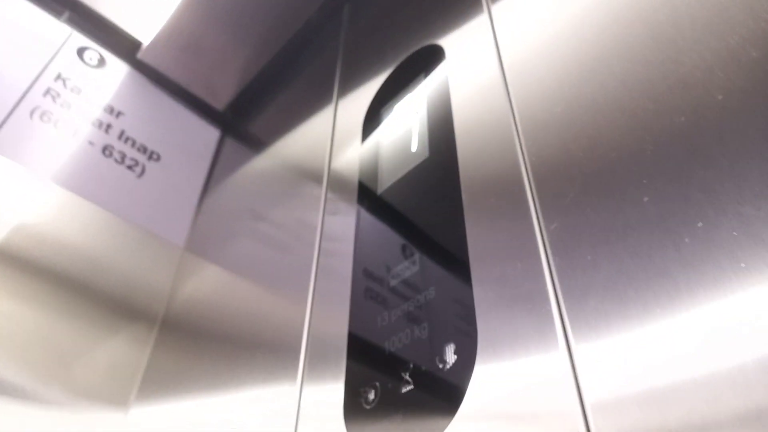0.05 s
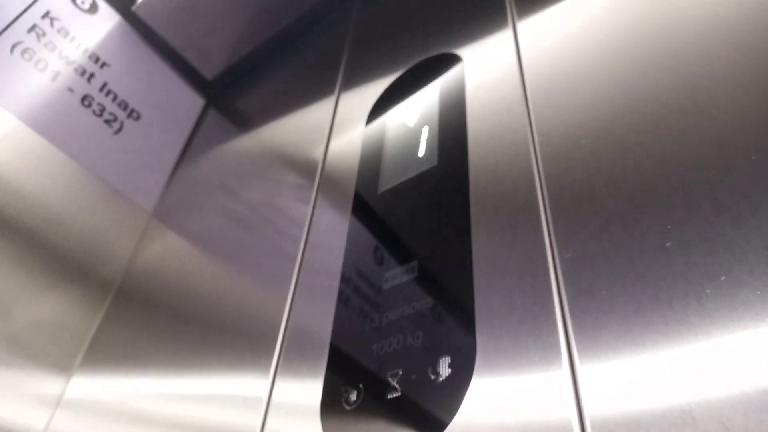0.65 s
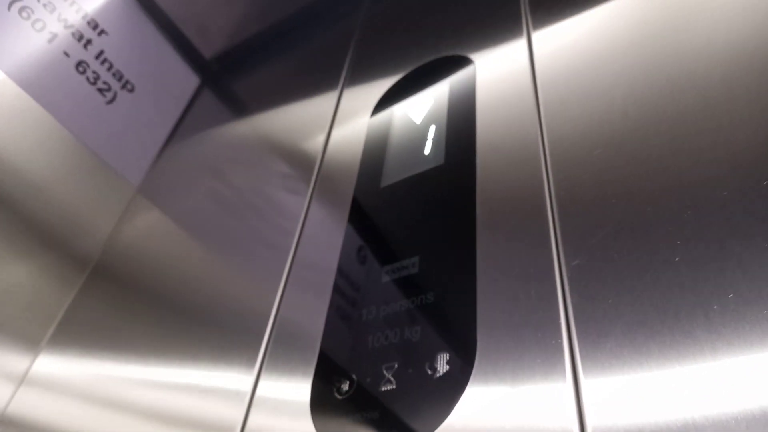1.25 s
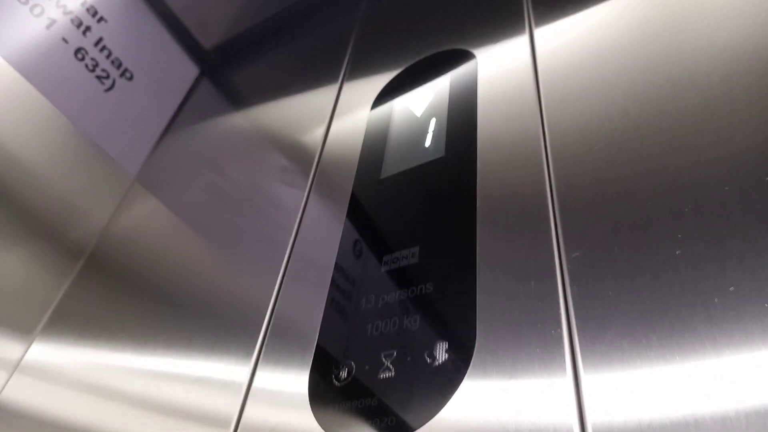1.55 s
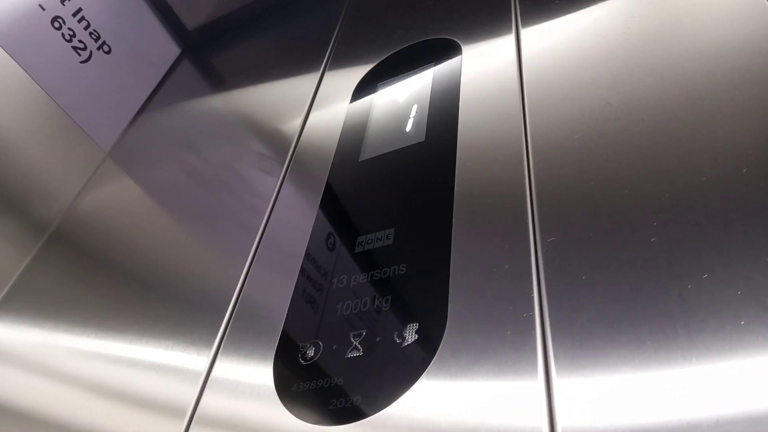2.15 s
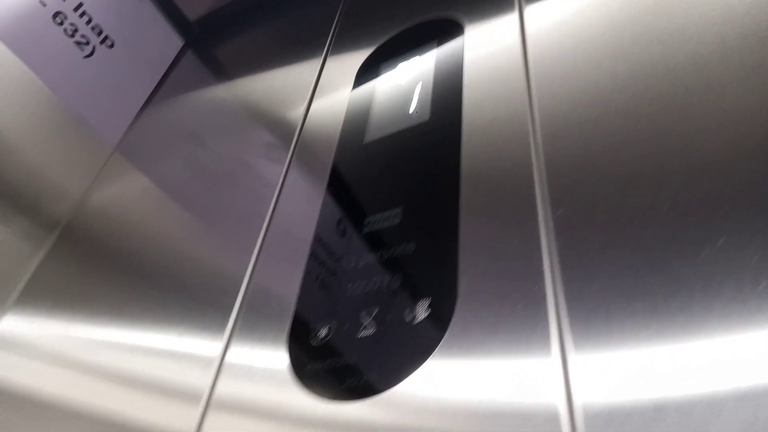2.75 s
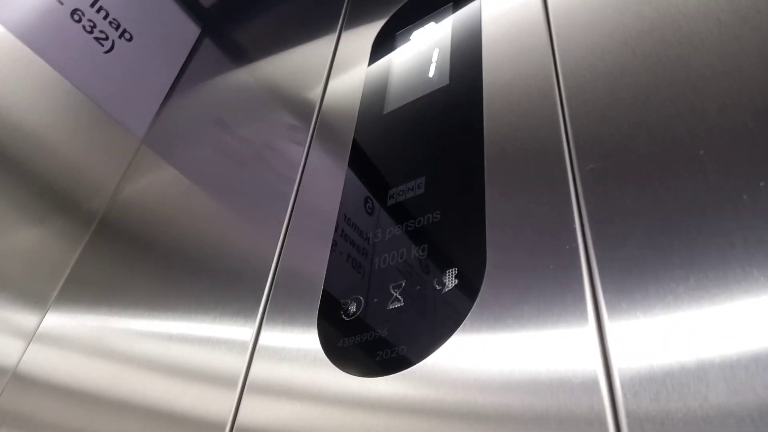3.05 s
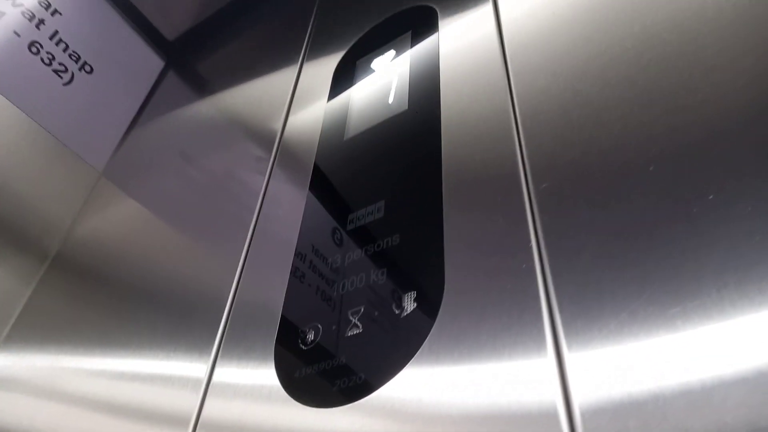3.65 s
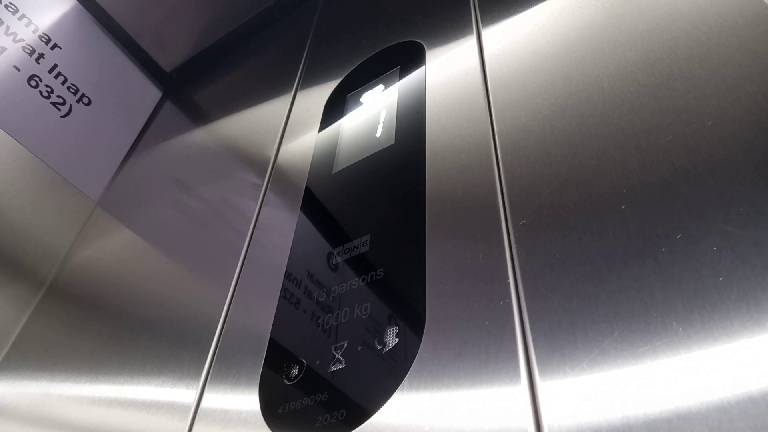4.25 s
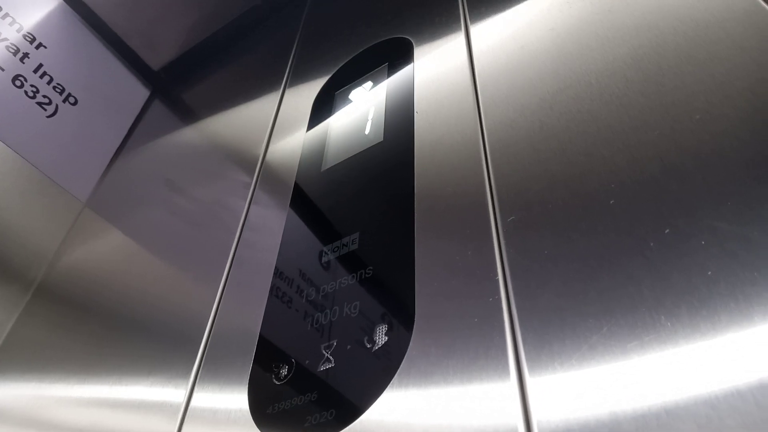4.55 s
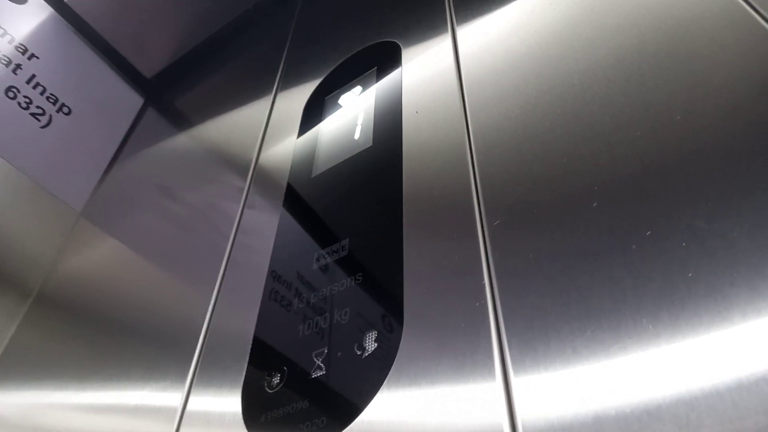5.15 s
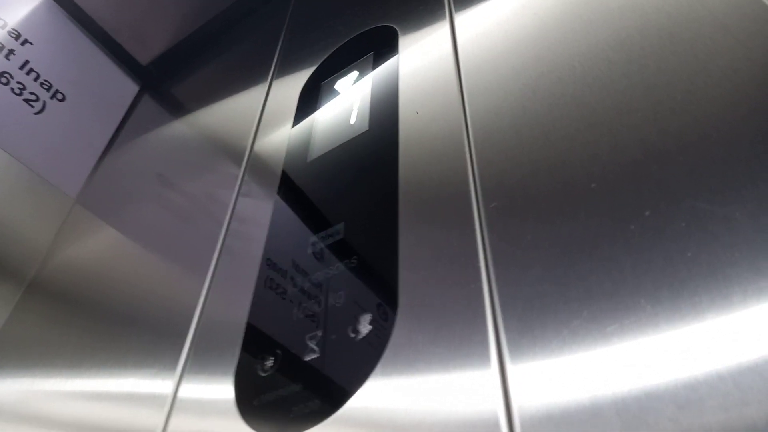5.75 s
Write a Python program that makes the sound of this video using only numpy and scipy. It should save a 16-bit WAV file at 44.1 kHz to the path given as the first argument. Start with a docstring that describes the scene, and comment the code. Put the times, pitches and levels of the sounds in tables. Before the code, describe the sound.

Low, throbbing rumble inside a travelling steel elevator, with light ticks, a small jolt and a few sharp snaps.

```python
"""Inside a travelling steel elevator car. Throughout, rollers rumble in the air and wall modes and
whine faintly, the drive hum swells and fades, the vent hisses. From 0.7 s uneven rails make the air
throb; from 1.9 s the trim ticks; at 2.8 s, two dry taps. At 3.9 s the car jolts: soft knocks, a panel
squeaks. Sharp snaps ring between the metal walls at 4.1 and 4.9 s, the second over a soft rustle.
More knocks and a fainter squeak follow at 5.3 s, a last rustle and snap at 6 s."""
import sys
import numpy as np
from scipy import signal
from scipy.fft import rfft, irfft, next_fast_len
from scipy.io import wavfile
from scipy.ndimage import uniform_filter1d

SR = 44100
rng = np.random.default_rng(int(sys.argv[2]) if len(sys.argv) > 2 else 0)


def log_audio(samples):
    """Write samples as a 16-bit WAV file to the path given in sys.argv[1]."""
    # one column per channel
    frames = np.atleast_2d(samples).T
    # limit to full scale, then quantise
    limited = np.clip(frames, -1, 1)
    pcm = np.round(limited * 32767).astype(np.int16)
    wavfile.write(sys.argv[1], SR, pcm)


N = 264732
TIME = np.arange(N) / SR
OPPOSED = np.array([[1], [-1]])  # left, right


def from_db(db):
    """dB to gain."""
    return 10 ** (np.asarray(db) / 20)


def pan(db):
    """Stereo gains for an L-R level difference."""
    return from_db(OPPOSED * db / 2)


def in_time(rows):
    """Columns of a time table, interpolated per sample."""
    t_s, *columns = np.transpose(rows)
    return [np.interp(TIME, t_s, column) for column in columns]


def at_hz(points, hz):
    """Table lookup on a log-frequency axis."""
    known_hz, values = np.transpose(points)
    return np.interp(np.log(hz + 1e-3), np.log(known_hz), values)


def colour(x, points):
    """Minimum-phase filter from rows of f/Hz, gain/dB."""
    size = 2 * next_fast_len(x.shape[-1] // 2 + 4096)
    gain = from_db(at_hz(points, np.fft.rfftfreq(size, 1 / SR)))
    cepstrum = irfft(np.log(gain))
    cepstrum[1:size // 2] *= 2
    cepstrum[size // 2 + 1:] = 0
    return irfft(rfft(x, size) * np.exp(rfft(cepstrum)))[..., :x.shape[-1]]


def resonate(x, hz, width_hz, stages=1):
    """Resonance of peak gain 1, in identical cascaded stages."""
    for _ in range(stages):
        x = signal.lfilter(*signal.iirpeak(hz, hz / width_hz, fs=SR), x + 1e-18)
    return x


def ring(x, modes):
    """Parallel resonances."""
    return sum(from_db(db) * resonate(x, hz, width_hz) for hz, width_hz, db in modes)


def drift(rate_hz):
    """Smooth random wander, standard deviation 1."""
    size = next_fast_len(N)
    rolloff = 1 + (np.fft.rfftfreq(size, 1 / SR) / rate_hz) ** 2
    slow = irfft(rfft(rng.standard_normal(size)) / rolloff, size)[:N]
    return slow / slow.std()


def swell(centre_s, length_s):
    """Flat-topped bell of height 1."""
    return np.exp(-np.abs(2 * (TIME - centre_s) / length_s) ** 3.9)


def tone(hz, wander_hz, flutter_db, lead_rad):
    """Wavering sine, left side leading."""
    phase = 2 * np.pi * np.cumsum(hz + wander_hz * drift(4.92)) / SR
    gain = np.sqrt(2) * from_db(flutter_db * drift(3.4))
    return gain * np.sin([phase + lead_rad, phase])


def blow(t_s, level_db, pan_db, rise_s, crack_db, crack_s, t60_s):
    """One contact: direct crack, then dense reflections dying between the walls."""
    age_s = TIME[:SR // 2]
    crack = from_db(crack_db) * np.exp(-age_s / crack_s) * pan(pan_db)
    reflections = from_db(-60 * age_s / t60_s)
    envelope = (1 - np.exp(-age_s / rise_s)) * np.hypot(crack, reflections)
    burst = from_db(level_db) * pan(pan_db) * envelope * rng.standard_normal((2, len(age_s)))
    return np.pad(burst, ((0, 0), (round(t_s * SR), N)))[:, :N]


def rattle(rate_hz, depth_db):
    """Chatter of a loose part, as a gain of rms 1."""
    gain = from_db(depth_db * np.tanh(drift(rate_hz)))
    return gain / np.sqrt(np.mean(gain ** 2))


def steel_walls(x, echo_db, count=6):
    """Early wall echoes comb each side differently."""
    gain = from_db(echo_db)
    lags = (rng.uniform(.003, .018, (2, count)) * SR).astype(int)
    echoes = [sum(np.pad(side, (lag, 0))[:N] for lag in side_lags) for side, side_lags in zip(x, lags)]
    bright = signal.sosfilt(signal.butter(2, 700, "high", fs=SR, output="sos"), echoes)
    return (x + gain * bright) / np.sqrt(1 + count * gain ** 2)


def ventilation():
    """Vent noise: coherent in the low mids; treble diffuse, to the right, swinging more with draught."""
    spectrum = [(20, -94), (50, -76), (200, -76), (450, -77), (700, -81), (1050, -82.5), (1350, -88.5),
                (1700, -88), (2400, -92.5), (3200, -107.5), (4200, -107), (5600, -111), (6600, -103),
                (8500, -108), (12000, -99.8), (16000, -102)]  # f/Hz, density/dB
    coherence = [(100, 0.2), (300, 2.2), (600, 1.5), (1000, 0)]  # f/Hz, L-R correlation before clipping
    balance = [(500, -0.5), (1500, -4), (2300, -9.5), (3800, -26), (5500, -19.5), (6600, -4.5), (9000, -2)]  # f/Hz, L-R/dB
    draught = [(0, -1), (.85, -2.5), (1.0, -.8), (1.1, -1.3), (1.3, .3), (1.5, -.7), (1.68, .7),
               (1.82, -.2), (2.1, 0), (2.45, -1.5), (2.6, 0), (3.1, .5), (3.27, -1), (3.55, .5),
               (3.78, -1.8), (4.5, -.4), (5.2, 1.7), (5.55, -.3)]  # t/s, level/dB
    hz = np.fft.rfftfreq(N, 1 / SR)
    mid, side = rfft(rng.standard_normal((2, N))) * np.sqrt(SR / 2)
    alike = np.clip(at_hz(coherence, hz), -1, 1)
    stereo = np.sqrt((1 + alike) / 2) * mid + np.sqrt((1 - alike) / 2) * side * OPPOSED
    air = irfft(stereo * from_db(at_hz(spectrum, hz)) * pan(at_hz(balance, hz)), N)
    body = irfft(rfft(air) / (1 + (hz / 2800) ** 8), N)
    draught_db, = in_time(draught)
    hiss = from_db(0.8 * draught_db - 1) * (air - body)
    return from_db(draught_db) * (body + hiss)


def rustles():
    """Soft sliding noise that builds and stops."""
    events = [(4.84, -52.5, 0.22, 0.21), (6.0, -47.5, 0.27, .1)]  # peak t/s, level/dB, rise/s, fall/s
    eq = [(800, -18), (1800, 0), (2200, -5), (2700, -1), (3300, -3), (5000, -2), (6500, -1), (10000, 4.5),
          (13000, 3), (16000, -15)]  # f/Hz, gain/dB
    envelope = sum(from_db(db) * np.exp(-((TIME - t_s) / np.where(TIME < t_s, rise_s, fall_s)) ** 2)
                   for t_s, db, rise_s, fall_s in events)
    return colour(envelope * rng.standard_normal((2, N)), eq) * pan(db=-4.5)


def whine():
    """Thin tone of the rollers on the rails, sinking slightly."""
    curve = [(0, 489, -64.5), (1.3, 485.4, -59.5), (1.9, 491.4, -53.5), (2.4, 488.8, -59.5),
             (2.85, 490.7, -57), (3.15, 482, -51.5), (3.7, 477.7, -61), (5.4, 477.5, -61.5),
             (6.0, 478, -67)]  # t/s, f/Hz, level/dB
    hz, db = in_time(curve)
    return from_db(db) * tone(hz, wander_hz=2.49, flutter_db=3.0, lead_rad=0.96)


def ticks():
    """Thin, bright ticks as the trim works."""
    events = [(1.914, -54.5, -4), (2.178, -56.5, -3.5), (2.2975, -54.5, -3.5), (2.6549, -65, -2),
              (3.9030, -51, -1), (4.0005, -58, -4), (4.0424, -52, -2), (4.0929, -54, -1.5),
              (4.241, -52, -2), (4.688, -49, -2.5), (4.7330, -53.5, -3)]  # t/s, level/dB, L-R/dB
    eq = [(300, -4), (1200, 10), (2200, 9.5), (4000, 6.5), (5200, 8.5), (6600, 6.5), (8500, 9), (12000, 18),
          (16000, 10)]  # f/Hz, gain/dB
    trim_modes = [(4000, 320, 8.5), (6340, 400, 7)]  # f/Hz, width/Hz, gain/dB
    contacts = sum(blow(*row, rise_s=0.00095, crack_db=2.5, crack_s=0.017, t60_s=0.36) for row in events)
    return colour(contacts, eq) + ring(contacts, trim_modes)


def taps():
    """Heavily damped pulses, too close and small to stir the cabin."""
    events = [(2.8391, -3.5, -21), (2.8558, -8.5, -8.7)]  # t/s, body/dB, crack/dB
    modes = [(1300, 1560), (5100, 2700)]  # f/Hz, width/Hz
    out = 0
    for t_s, body_db, crack_db in events:
        pulse = signal.unit_impulse(N, round(t_s * SR))
        body, crack = [resonate(pulse, hz, width_hz, stages=2) for hz, width_hz in modes]
        out += from_db(body_db) * body + from_db(crack_db) * (crack + from_db(-12) * pulse)
    return out * pan(db=20)


def squeaks(sag_hz_per_s=830, width_hz=110, attack_s=0.012, fade_s=0.051):
    """A panel slips: uneven friction drives a narrow, falling resonance."""
    events = [(3.921, -38.5, 2028), (5.258, -51, 2070)]  # t/s, level/dB, f/Hz
    out = 0
    for t_s, db, start_hz in events:
        age_s = np.maximum(TIME - t_s, 0)
        phase = 2 * np.pi * np.cumsum(start_hz - sag_hz_per_s * age_s) / SR
        envelope = from_db(db) * (1 - np.exp(-age_s / attack_s)) * np.exp(-age_s / fade_s)
        band = [drift(width_hz) * np.sin(phase) + drift(width_hz) * np.cos(phase) for _ in range(2)]
        out += envelope * np.array(band)
    return out * pan(db=-4)


def knocks():
    """Soft contacts thump the cabin and rattle a loose panel."""
    events = [(3.918, -38.5, -5, 5, -8), (3.93, -37.5, 1.5, 3.5, -6), (5.254, -37.5, -3.5, -7.5, 1),
              (5.272, -38, 0, -7, -3), (5.3165, -40.5, -4.5, -21, 5.5), (5.357, -38.5, -3, -25, 3.5)]  # t/s, level/dB, L-R/dB, panel ring/dB, crack/dB
    eq = [(40, -5), (110, 15.5), (220, 17), (480, 14), (680, 1.5), (1100, -0.5), (3000, -2.5), (6400, -5),
          (7400, -5.5), (9500, 2.5), (12500, 6), (16000, -5)]  # f/Hz, gain/dB
    panel_modes = [(248, 16.8, 23), (800, 30, 15.5), (2014, 110, 9.5), (2260, 65, 1), (4380, 150, 0.5),
                   (5120, 180, 4.5), (5540, 160, 3), (8200, 300, 1), (11200, 150, 11), (11700, 220, 15),
                   (13300, 1000, 13)]  # f/Hz, width/Hz, gain/dB
    contacts = on_panel = 0
    for t_s, db, pan_db, ring_db, crack_db in events:
        contact = blow(t_s, db, pan_db, rise_s=0.0018, crack_db=crack_db, crack_s=0.0069, t60_s=0.28)
        contacts += contact
        on_panel += from_db(ring_db) * contact
    return colour(contacts, eq) + ring(on_panel * rattle(rate_hz=170, depth_db=2.5), panel_modes)


def snaps():
    """Hard, chattering snaps ring a small stiff part, each at its own pitch."""
    # t/s, level/dB, L-R/dB, rise/s, f/Hz, body/dB, treble/dB, top/dB, crack/dB
    events = [(4.128, -26, -3.5, .0001, 2860, -3, -2, 11.5, 4),
              (4.9071, -25, -3.5, 0.0014, 3970, 3.5, 10, 9, 1.5),
              (5.9771, -32, -4.5, 0.001, 2770, 1, 0.5, 4, 1)]
    eq = [(300, -13), (1300, -9), (2150, -8.5), (2650, 1), (3800, 0), (5200, -2), (6700, 1), (8500, 2.5),
          (11000, -5.5), (16000, -14.5)]  # f/Hz, gain/dB
    part_modes = [(3410, 92, 3), (4360, 510, -5), (5240, 110, -6), (6600, 100, -16)]  # f/Hz, width/Hz, gain/dB
    chatter = rattle(rate_hz=290, depth_db=2.0)
    contacts = pitched = 0
    for t_s, db, pan_db, rise_s, hz, body_db, treble_db, top_db, crack_db in events:
        contact = chatter * blow(t_s, db, pan_db, rise_s, crack_db, crack_s=0.0037, t60_s=0.23)
        brightness = [(1200, body_db), (2500, 0), (6500, 0), (8500, treble_db), (14000, top_db)]
        contact = colour(contact, brightness)
        contacts += contact
        pitched += from_db(2) * resonate(contact, hz, width_hz=200)
    return colour(contacts, eq) + ring(contacts, part_modes) + pitched


def hum_gain(swells, rest_db):
    """Swells add in power to a resting level."""
    power = sum((from_db(db) * swell(t_s, length_s)) ** 2 for t_s, length_s, db, *_ in swells)
    return np.sqrt(from_db(rest_db) ** 2 + power)


def drive():
    """Three hoist-drive tones swell and fade; the lowest shifts pitch between swells."""
    low_swells = [(1.154, 0.24, -39.5, 221.2), (2.677, 0.47, -48.5, 226.2), (3.598, 0.3, -39, 224.8),
                  (3.991, 0.201, -39.5, 241.8), (5.333, 0.23, -44, 228)]  # centre t/s, length/s, level/dB, f/Hz
    main_swells = [(.27, 0.4, -47.5), (.61, 0.088, -46), (.95, 0.17, -46), (1.3, .09, -46.5),
                   (1.7, 0.15, -48.5), (2.07, 0.1, -44), (2.65, 0.34, -46.5), (3.15, 0.2, -40.5),
                   (3.54, 0.24, -42.5), (3.99, 0.26, -43.5), (4.55, 0.66, -42), (5.22, 0.39, -40),
                   (5.76, 0.2, -41.5)]  # centre t/s, length/s, level/dB
    top_swells = [(1.3, 1.2, -60.5), (2.35, 0.48, -59), (3.3, 0.2, -56.5), (4.95, 0.52, -55.5),
                  (5.7, .3, -62)]  # centre t/s, length/s, level/dB
    low_hz, = in_time([(t_s + edge * length_s / 2, hz)
                       for t_s, length_s, _, hz in low_swells for edge in (-1, 1)])
    low = tone(low_hz, wander_hz=1.37, flutter_db=1.5, lead_rad=0.076)
    main = tone(hz=326.7, wander_hz=0.9, flutter_db=-0.43, lead_rad=0.44)
    top = tone(hz=443.3, wander_hz=2.18, flutter_db=2.5, lead_rad=0.6)
    low *= hum_gain(low_swells, rest_db=-60.5)
    main *= hum_gain(main_swells, rest_db=-57)
    top *= hum_gain(top_swells, rest_db=-60)
    return (low + main + top) * pan(db=-2)


def jolt(t_s, air_db, wall_db, attack_s=0.005, hold_s=0.2, settle_s=0.035, wall_fade_s=0.075):
    """Extra shaking in dB: the air booms on briefly, the walls calm sooner."""
    age_s = np.maximum(TIME - t_s, 0)
    onset = 1 - np.exp(-age_s / attack_s)
    settling = np.exp(-np.maximum(age_s - hold_s, 0) / settle_s)
    return air_db * onset * settling, wall_db * onset * np.exp(-age_s / wall_fade_s)


def rolling(modes, window_s):
    """Roller noise shakes each mode, unequally per side; running rms held at 1."""
    out = 0
    for hz, width_hz, db, side_db in modes:
        shaking = rng.standard_normal((2, N + SR // 2))
        mid, side = resonate(shaking, hz, width_hz, stages=2)[:, -N:]
        out += from_db(db) * (mid + from_db(side_db) * side * OPPOSED)
    power = uniform_filter1d(np.mean(out ** 2, axis=0), int(window_s * SR))
    return out / np.sqrt(power)


def rumble():
    """Rollers on uneven rails: cabin air throbs and booms, walls drone."""
    ride = [(0, -43, -44.5), (.35, -42, -40.5), (.8, -43.5, -44), (1.15, -44.5, -42), (2.1, -40.5, -43),
            (2.75, -44, -41.5), (3.2, -40, -41), (3.85, -42, -40), (4.45, -42.5, -42), (4.7, -41, -39.5),
            (4.87, -43.5, -41.5), (5.4, -39.5, -39.5), (5.55, -41.5, -42), (6.0, -46.5, -41.5)]  # t/s, air level/dB, wall level/dB
    throb_level = [(0, -39), (.4, -47.5), (.65, -39), (.8, -48), (1.0, -41.5), (1.7, -39.5), (2.3, -40.5),
                   (2.75, -45), (3.3, -35), (3.5, -36.5), (3.76, -46), (3.97, -36.5), (4.17, -39.5),
                   (4.42, -48.5), (4.6, -39.5), (4.85, -46), (6.0, -47.5)]  # t/s, level/dB
    rail_bumps = [(0.709, 6), (1.06, 8), (1.35, 5), (1.47, 6), (1.62, 10), (1.87, 8), (2.24, 0), (2.48, 8),
                  (2.95, 6), (3.601, 7.5)]  # t/s, surge/dB
    # cabin resonances: f/Hz, width/Hz, gain/dB, side re mid/dB
    throb_modes = [(80.1, 16.5, 3.5, -20), (69.3, 32, -12, -22), (93.2, 14, -11.5, -18)]
    air_modes = [(46.4, 15, -7, -29), (112.6, 30.5, 0.5, -22.5), (138, 31.6, 2, -17)]
    wall_modes = [(184.3, 27.4, -3.5, -14.5), (227.8, 13.4, -4, -9), (242.6, 14.2, -2, -13.5),
                  (261.8, 22, 1.5, -15.5), (287.7, 7.2, -1.5, -12.5), (310.6, 20, -6, -19),
                  (348, 11, -7, 1.5), (373.7, 13, -5, -15), (393, 9.1, -10, -6), (419.4, 19, -8.5, -11),
                  (421, 8.2, -16.5, -4.5), (493.8, 48.5, -14, -1.5), (554.3, 13, -14, -15.5),
                  (577, 14, -23.5, 4.5), (631.5, 22, -25, 12)]
    air_db, wall_db = in_time(ride)
    throb_db, = in_time(throb_level)
    air_jolt_db, wall_jolt_db = jolt(t_s=3.92, air_db=7, wall_db=14.5)
    surge_db = sum(db * swell(t_s, length_s=0.067) for t_s, db in rail_bumps)
    throb = from_db(throb_db + surge_db - 0.1) * rolling(throb_modes, window_s=0.18)
    boom = from_db(air_db + 0.39 * surge_db + air_jolt_db + 0.13) * rolling(air_modes, window_s=0.18)
    drone = from_db(wall_db + wall_jolt_db - 0.8) * rolling(wall_modes, window_s=0.12)
    return (throb + boom + drone) * from_db(0.38 * drift(5.5)) * pan(db=-1.16)


def scene():
    """Running car plus the small noises inside."""
    running = rumble() + drive() + whine()
    airy = steel_walls(ventilation() + rustles(), echo_db=-15.5)
    return running + airy + ticks() + snaps() + knocks() + squeaks() + taps()


def record(dry):
    """Treble shelved down near 7 kHz, cut at 15.9 kHz."""
    shelf = [(6800, 0), (7300, -18)]  # f/Hz, gain/dB
    lowpass = signal.ellip(10, .2, 70, 15900, fs=SR, output="sos")
    return signal.sosfilt(lowpass, colour(dry, shelf))


dry = scene()
out = record(dry)
log_audio(out)
```